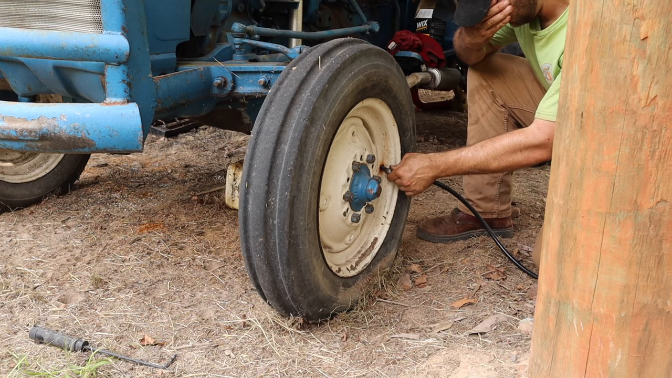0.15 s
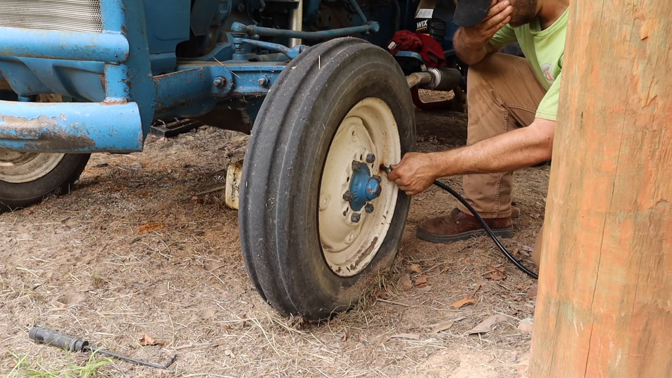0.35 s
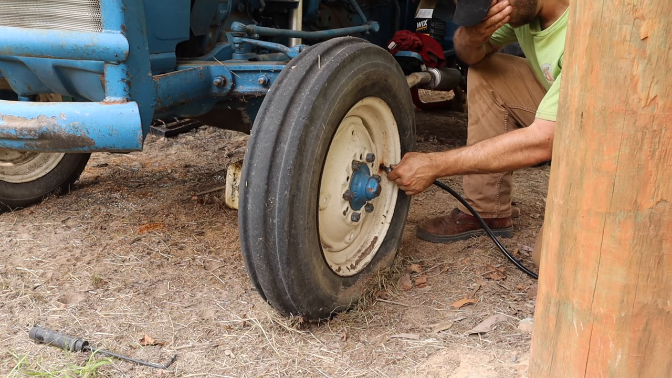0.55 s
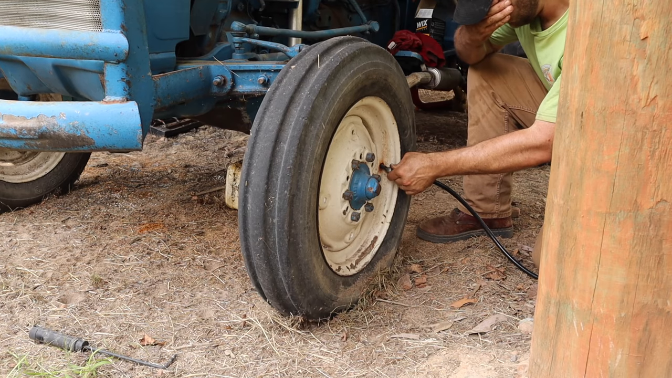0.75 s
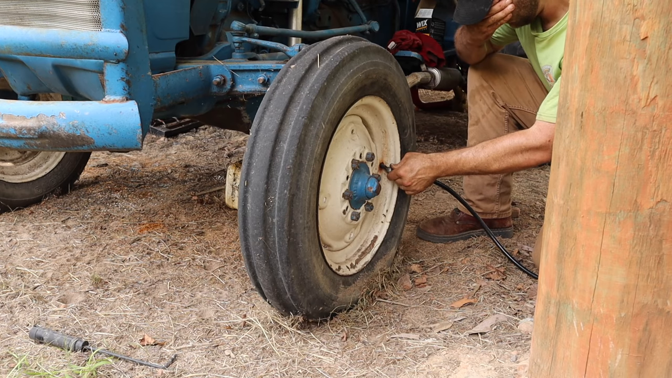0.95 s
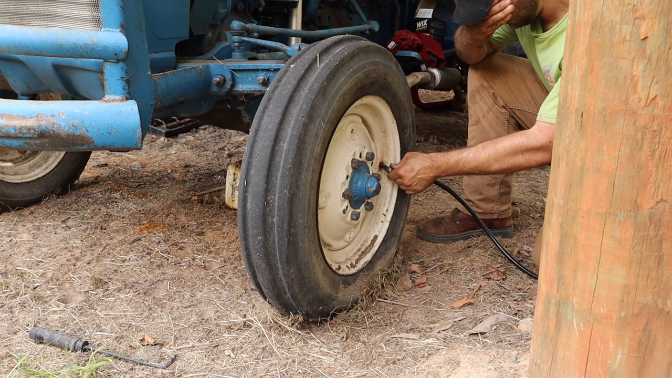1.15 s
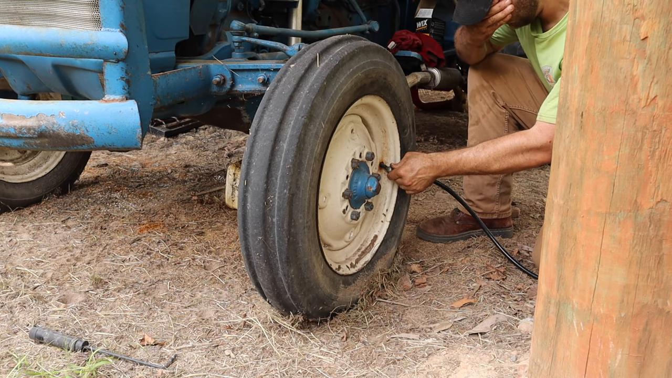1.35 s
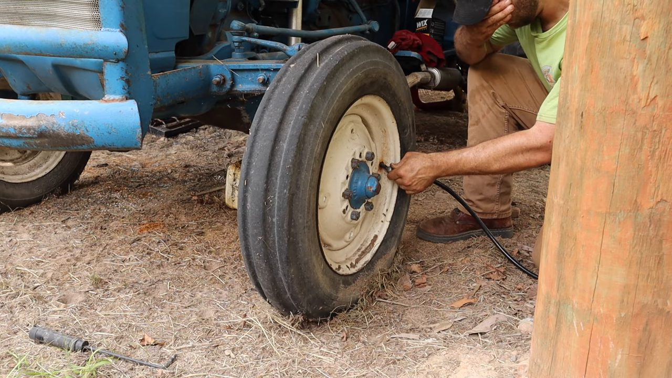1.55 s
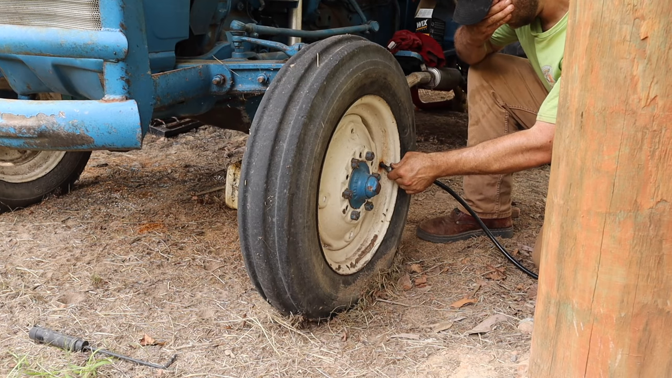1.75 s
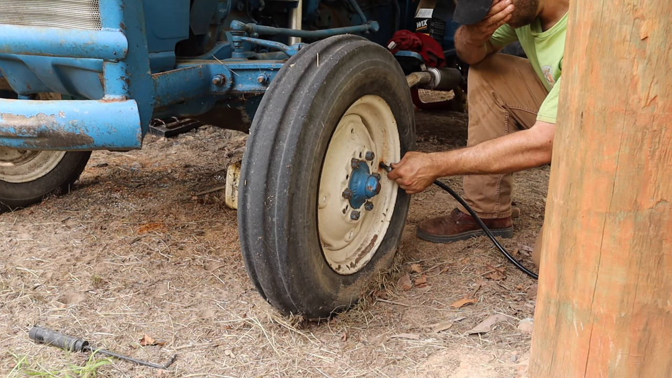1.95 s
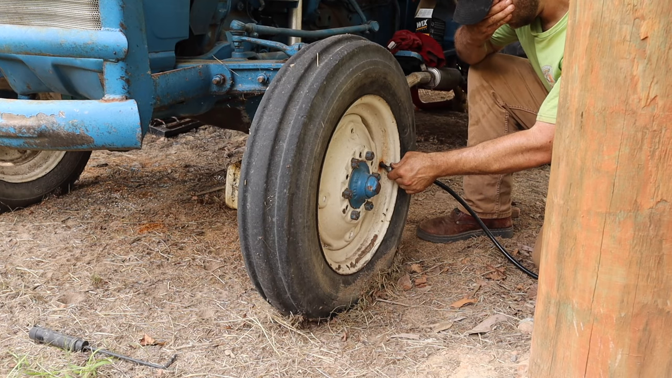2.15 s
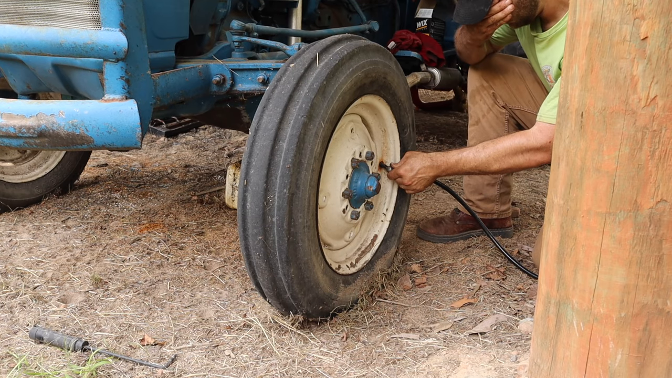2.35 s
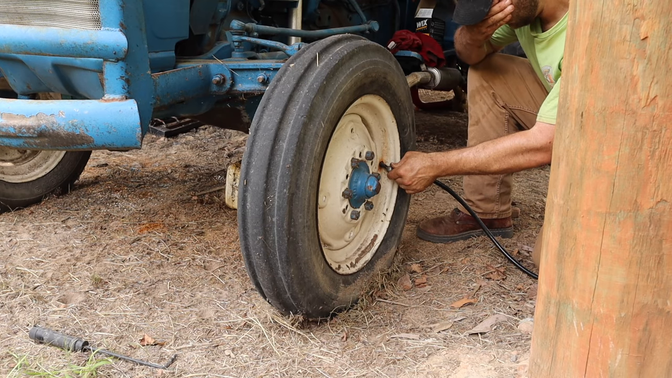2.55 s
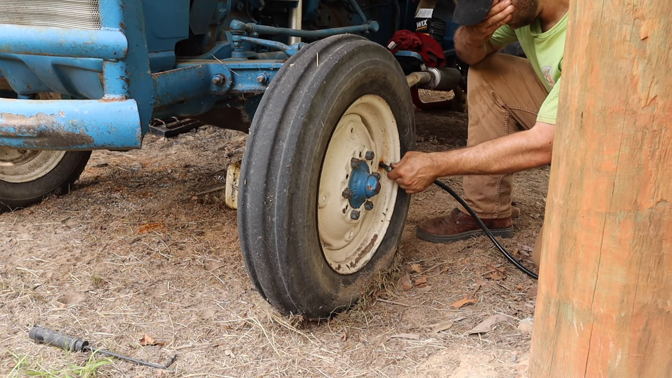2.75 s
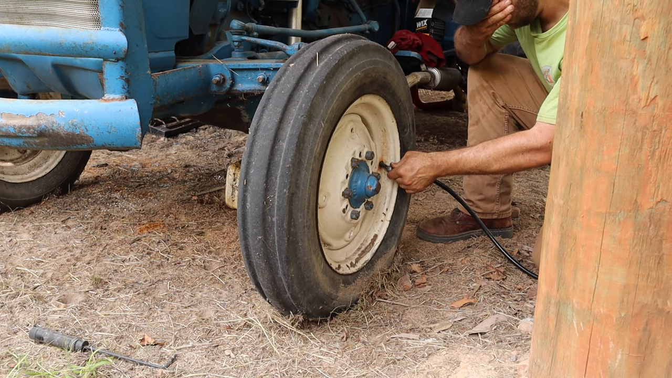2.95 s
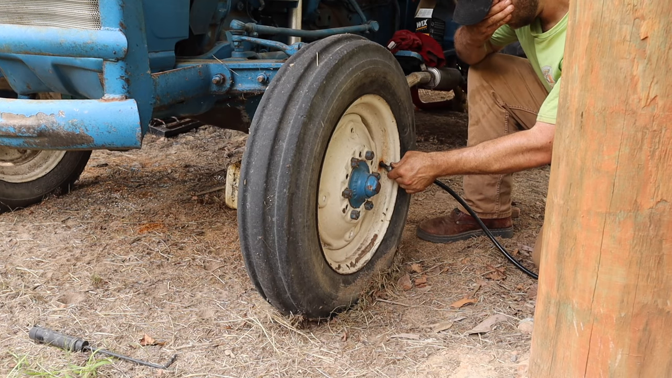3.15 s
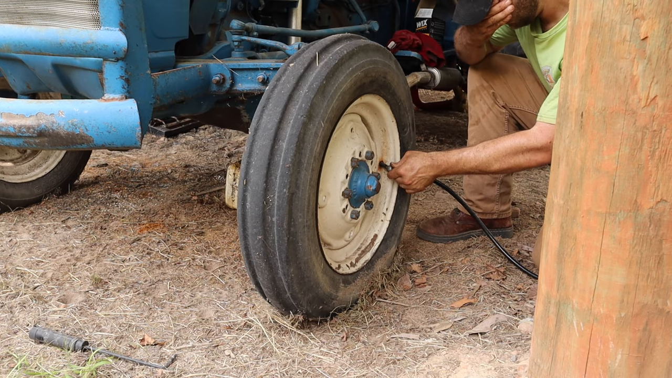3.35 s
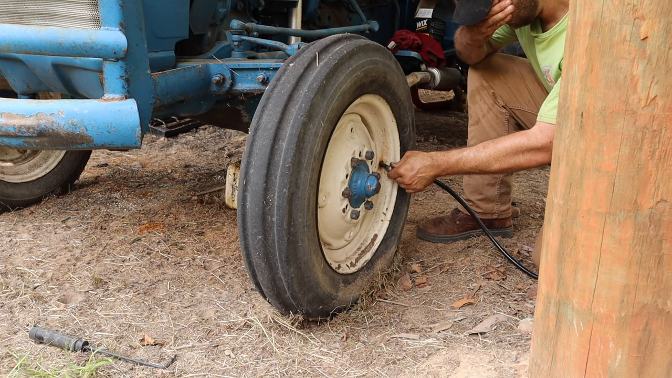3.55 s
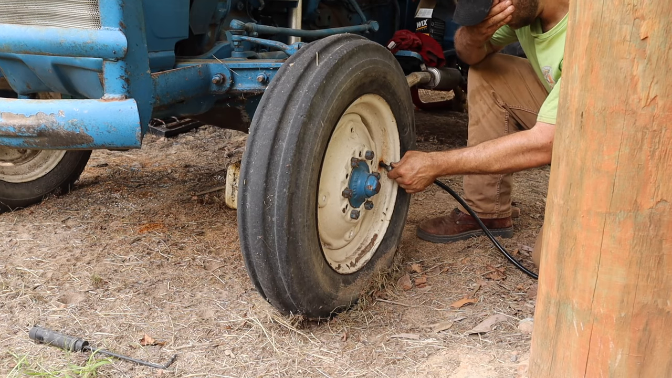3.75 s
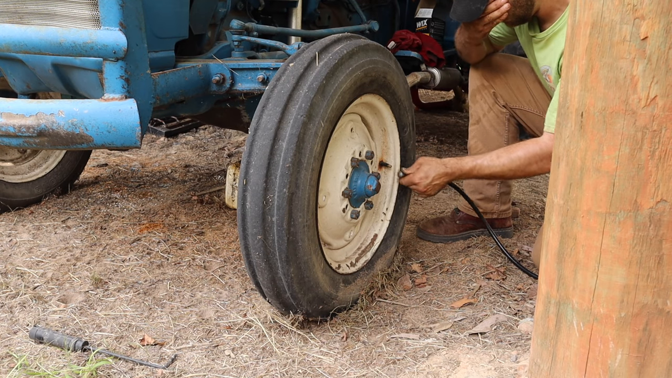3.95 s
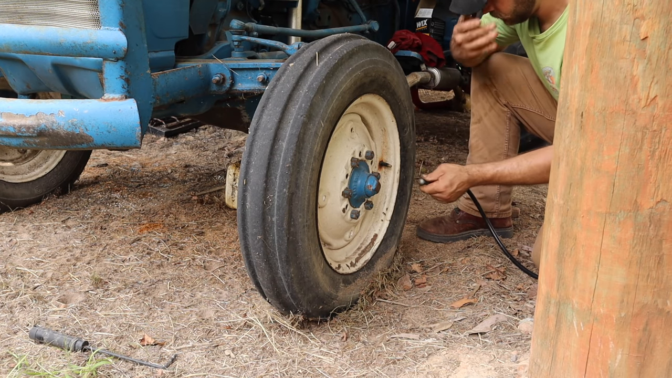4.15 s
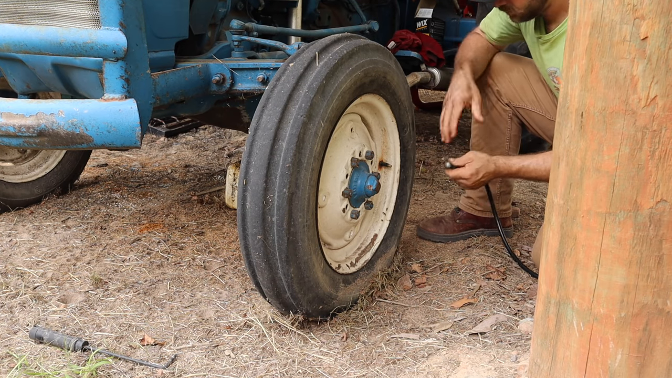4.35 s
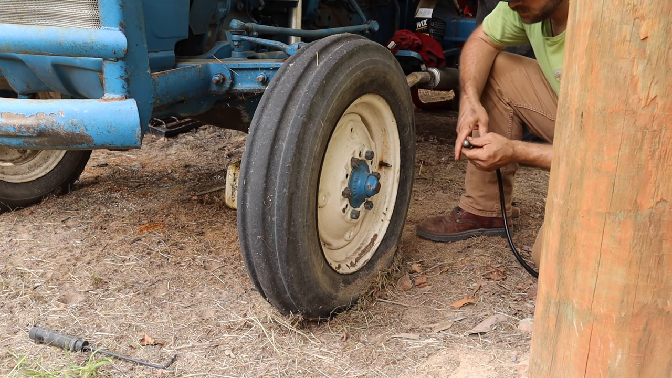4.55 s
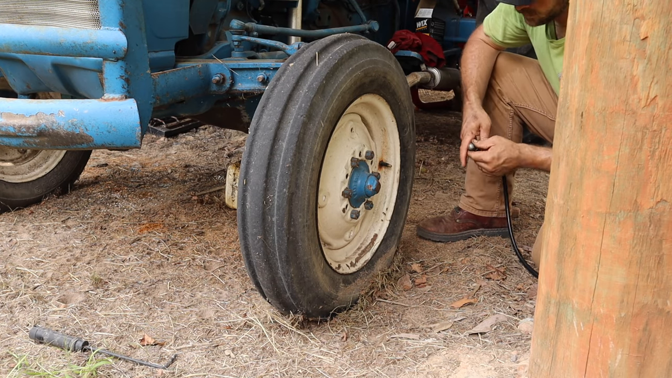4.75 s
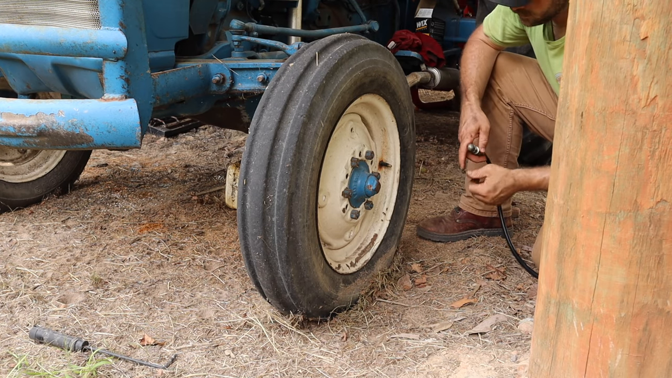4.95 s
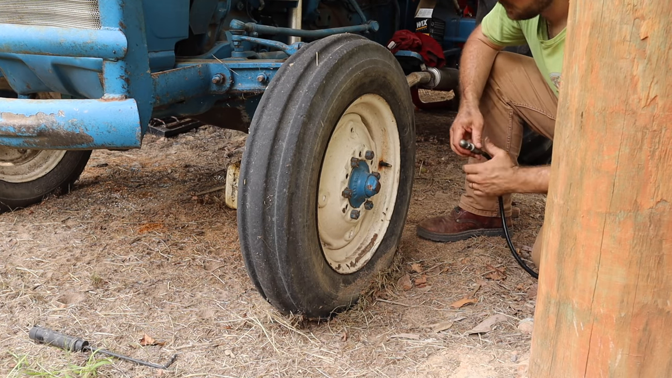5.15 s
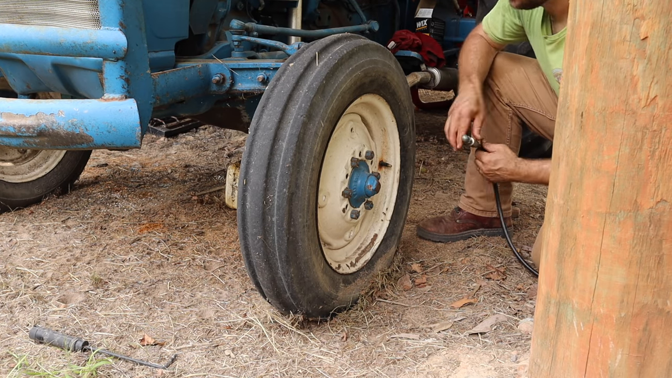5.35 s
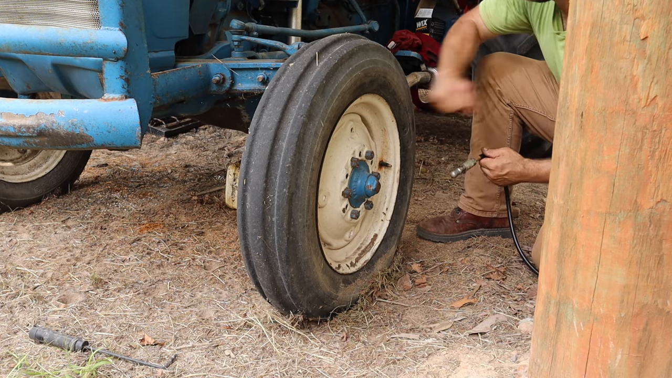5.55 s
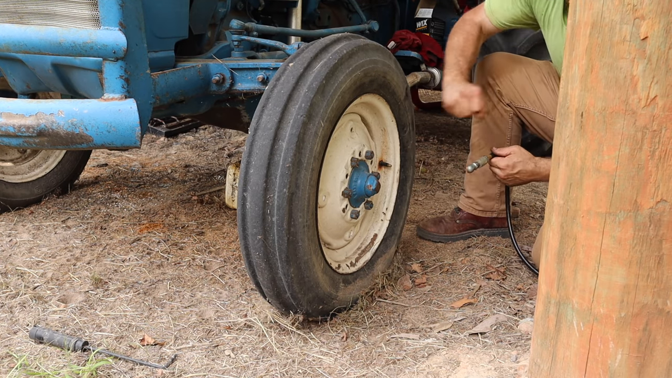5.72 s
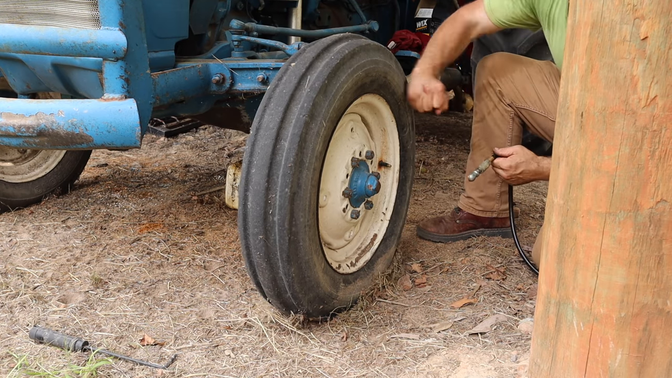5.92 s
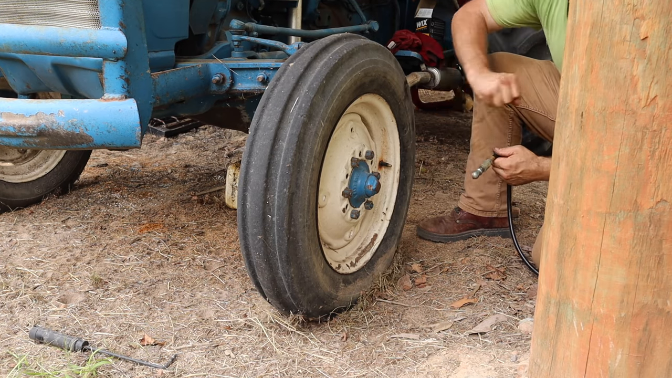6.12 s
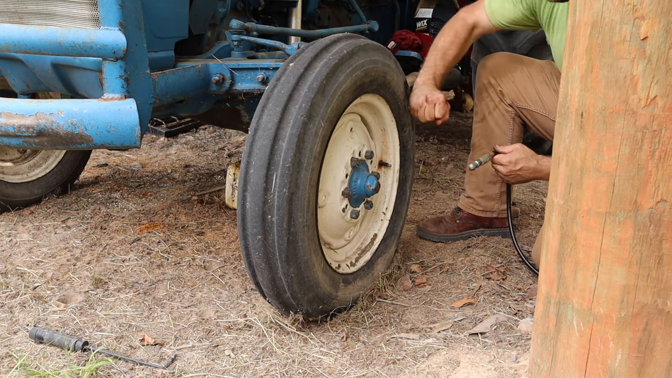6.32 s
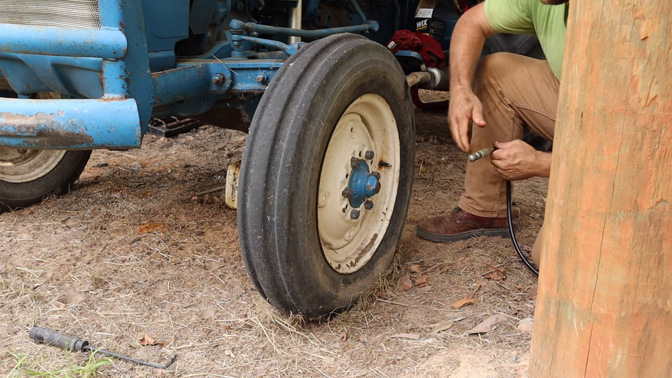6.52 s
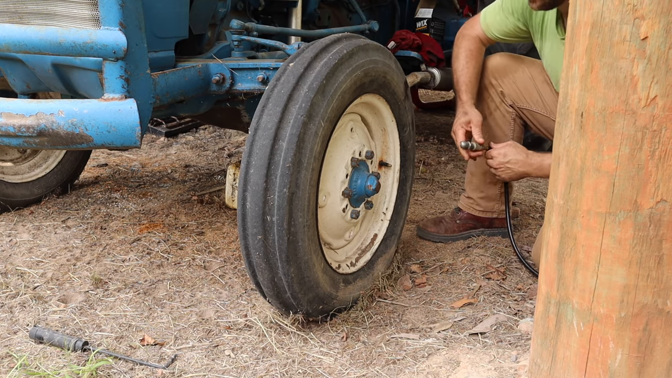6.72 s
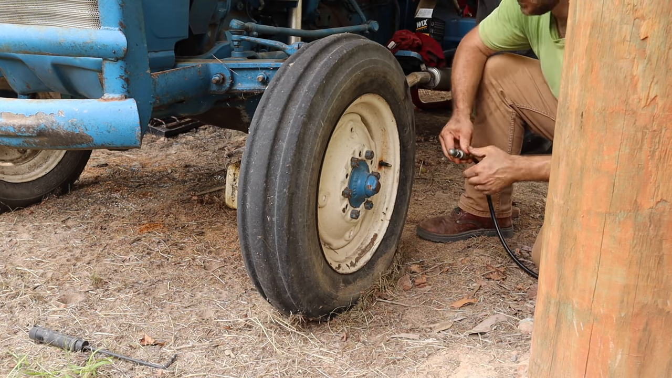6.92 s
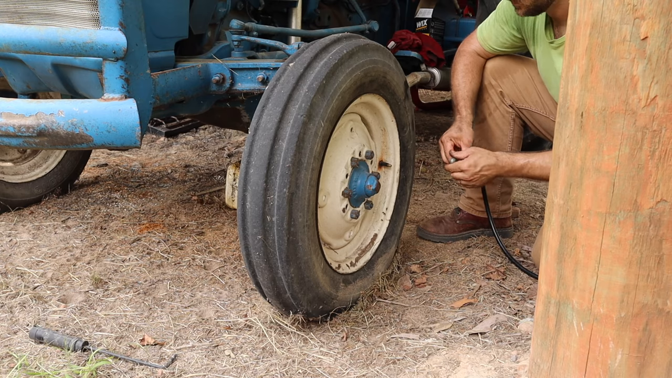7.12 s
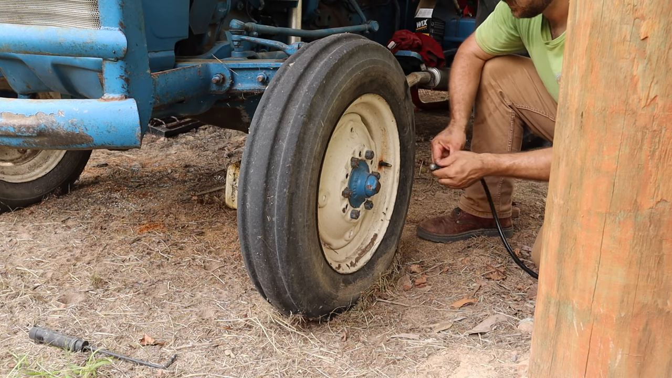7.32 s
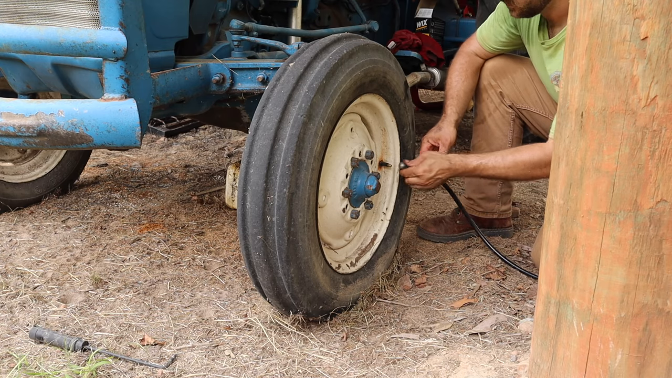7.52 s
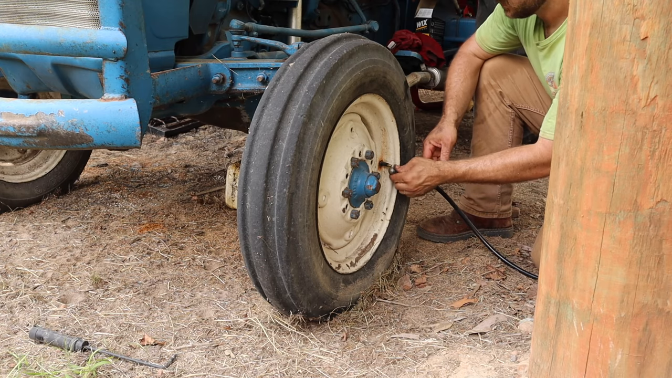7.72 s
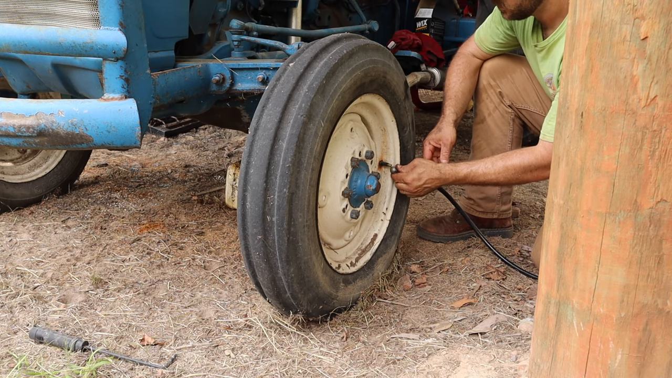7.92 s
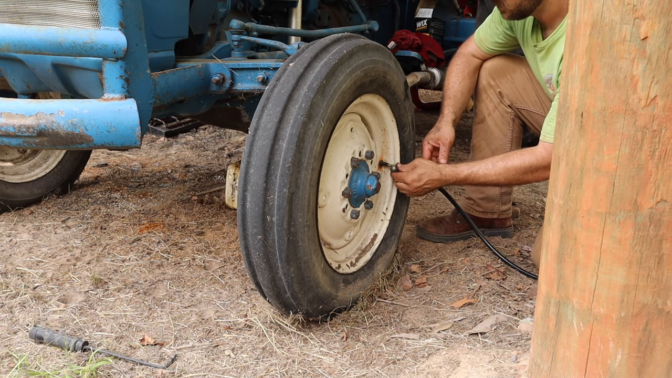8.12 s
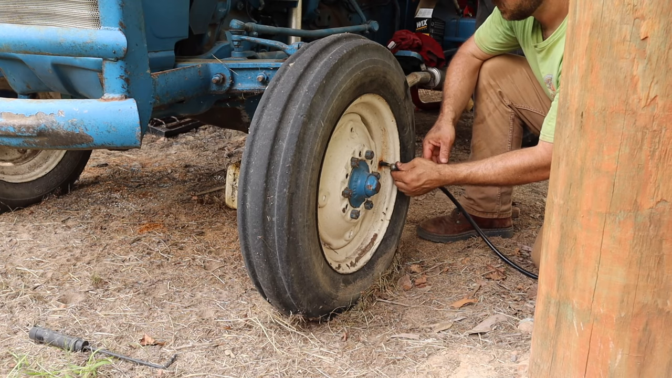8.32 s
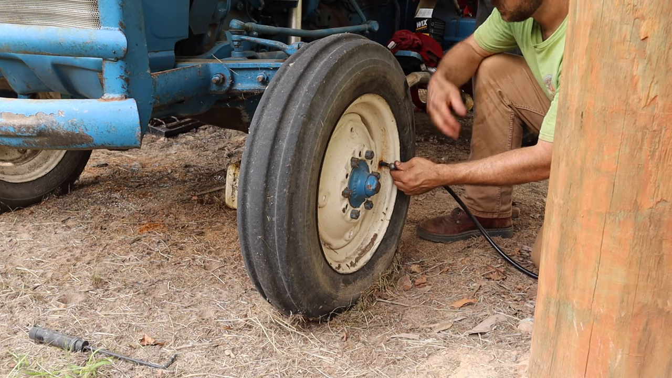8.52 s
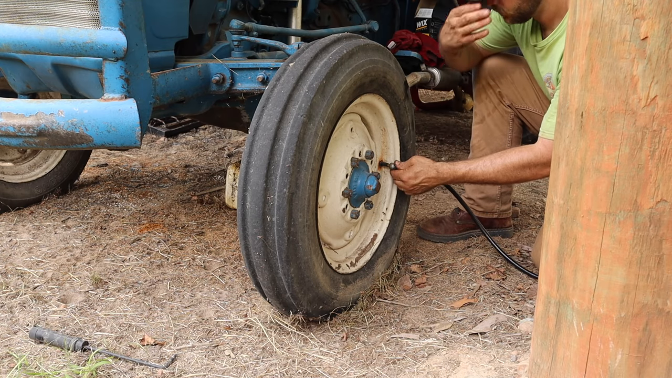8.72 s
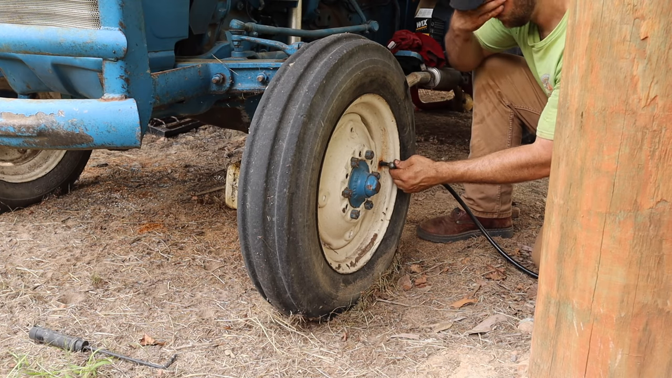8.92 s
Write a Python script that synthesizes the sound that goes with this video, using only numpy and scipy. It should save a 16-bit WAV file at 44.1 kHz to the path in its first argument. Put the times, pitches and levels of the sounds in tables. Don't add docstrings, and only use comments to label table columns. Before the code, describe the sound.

After a brief indoor hum, air sings through a tyre valve; the chuck pops off, three hollow thuds follow, then ticks and loud hissing.

```python
import sys
import numpy as np
from scipy import signal
from scipy.fft import rfft, irfft, next_fast_len
from scipy.io import wavfile
from scipy.ndimage import uniform_filter1d, map_coordinates

SR = 44100
rng = np.random.default_rng(int(sys.argv[2]) if len(sys.argv) > 2 else 0)


def gain_from_decibels(decibels):
    exponent = np.asarray(decibels, float) / 20
    return 10 ** exponent


def file_out(sig):
    cols = np.atleast_2d(sig).T
    lim = np.clip(cols, -1, 1)
    pcm = np.round(lim * 32767).astype(np.int16)
    wavfile.write(sys.argv[1], SR, pcm)


N = 400428
CUT_S = 1.183


def track(table, n, t0):
    s, *columns = np.transpose(table)
    times = t0 + np.arange(n) / SR
    return [np.interp(times, s, column) for column in columns]


def add(out, t0, x):
    i = int(t0 * SR)
    out[:, i:i + x.shape[-1]] += x[..., :N - i]


def seconds(length_s):
    return np.arange(int(length_s * SR)) / SR


def walk(n, rate):
    levels = rng.standard_normal(int(n * rate / SR) + 4)
    places = 1 + np.arange(0, n, 32) * rate / SR
    return 1.2 * map_coordinates(levels, [places], order=3).repeat(32)[:n]


def low_pass(x, order, hz):
    return signal.sosfilt(signal.butter(order, hz, fs=SR, output="sos"), x)


def high_pass(x, order, hz):
    return signal.sosfilt(signal.butter(order, hz, "high", fs=SR, output="sos"), x)


def turbulence(n, chance, colour, lifts=(), flicker_db=13.0, rate=12.0, tilt=None):
    m = next_fast_len(n, True)
    hz = np.arange(1, m // 2 + 2) * SR / m
    f, db = np.transpose(colour)
    db = np.interp(np.log(hz), np.log(f), db, left=-120, right=-120)
    for centre_hz, width, lift_db in lifts:
        db = db + lift_db / (1 + (2 * (hz - centre_hz) / width) ** 2)
    spectrum = chance * gain_from_decibels(db)
    out, untilted = np.zeros(n), 0
    for centre in 2 ** np.arange(4, 16):
        share = np.clip(1 - abs(np.log2(hz / centre)), 0, 1)
        if centre > f[0] / 2 and centre < 2 * f[-1]:
            band = irfft(spectrum * share, m)[:n] * gain_from_decibels(flicker_db * walk(n, rate))
            untilted = untilted + band
            out += band * (gain_from_decibels(tilt[1]) if tilt and centre > tilt[0] else 1)
    return out / np.std(untilted)


def ports(n, mid, side, side_db, peaks=(), alike=0., **how):
    one, other = rfft(rng.standard_normal((2, next_fast_len(n, True))))
    alike = np.clip(alike, -1, 1)
    across = np.sqrt(1 - alike ** 2) * other - 1j * alike * one
    m = turbulence(n, one, mid, [p[:3] for p in peaks], **how)
    s = gain_from_decibels(side_db) * turbulence(n, across, side, [p[:2] + p[3:] for p in peaks], **how)
    return np.array([m + s, m - s])


def knock(peak_db, bright_db, ring_hz, sharpness, t60, click, top_hz):
    t = seconds(.08)
    burst = rng.standard_normal(len(t)) + 1.4 * rng.standard_normal((2, len(t)))
    burst = burst * gain_from_decibels(-60 * t / t60)
    burst[:, 0] += click
    body = signal.iirpeak(ring_hz, sharpness, fs=SR)
    ring = signal.lfilter(*body, signal.lfilter(*body, burst))
    ring = low_pass(ring, 4, top_hz)
    crack_band = signal.butter(5, [1100., top_hz], "band", fs=SR, output="sos")
    crack = signal.sosfilt(crack_band, burst * gain_from_decibels(-60 * t / 0.011))
    return gain_from_decibels(peak_db) * (ring / abs(ring).max() + gain_from_decibels(bright_db) * crack / abs(crack).max())


def knocks(out, events, **body):
    for t0, peak_db, bright_db in events:
        add(out, t0, knock(peak_db, bright_db, **body))


# frequency in Hz, level in dB per Hz.
CORNER_MID = [(18, -69), (30, -25), (187, -12.5), (207, -14.5), (284, -7.5), (332, -8.5), (559, -8),
              (708, -8), (765, -12), (828, -10), (1470, -20.5), (1630, -17.5), (15400, -31.5)]
CORNER_SIDE = [(59, -70), (100, -40), (180, -30), (563, -6), (1150, -3), (1690, -1.5), (7070, -6),
               (8200, -6.5), (15400, -5.5)]
# frequency in Hz, width in Hz, lift in sum in dB, lift in difference in dB.
HUM = [(221, 37, 11.5, 0), (285.3, 8.2, 14, 0), (460, 16, 10, 3), (571, 14, 14, 0), (766, 7.6, 23.5, 3),
       (938, 15, 10.5, 4), (6730, 53, 10.5, 1), (8830, 90, 10.5, 2), (15800, 12000, 13.5, 3)]


def corner(out):
    tone = ports(int(CUT_S * SR), CORNER_MID, CORNER_SIDE, -5.5, HUM, flicker_db=0.5, rate=5.2)
    add(out, 0, gain_from_decibels(-44.5) * tone)


# start in seconds, peak in dB, brightness in dB.
CLATTER = [
    (.114, -28.5, -12.),
    (.119, -31.5, -13),
    (.1225, -36, -22),
    (.138, -34, -14.),
]


def clatter(out):
    knocks(out, CLATTER, ring_hz=1900, sharpness=0.63, t60=0.096, click=1.5, top_hz=7000)


# frequency in Hz, level in dB per Hz.
YARD_MID = [(12, -35), (20, -20.5), (59, 1), (178, -1), (337, -15), (377, -14), (421, -17.5), (525, -14),
            (1350, -27), (1460, -32.5), (3970, -41), (5600, -45), (6900, -53), (9600, -64), (11000, -54),
            (12400, -59), (15000, -80)]
YARD_SIDE = [ (35, -51.5), (60, -23), (132, 0), (394, 6), (2350, -10.5), (4610, -16.5), (7340, -23),
             (8240, -16), (9260, -25.5), (12000, -26), (15400, -37.5)]
# time in seconds, treble lift in dB.
BREEZE = [
    (1.2, 7.5),
    (3.9, 9),
    (4.3, 12),
    (4.55, 9),
    (5.6, 10.5),
    (6.6, 6),
    (7.3, 10),
    (9.08, 10),
]


def yard(out):
    n = N - int(CUT_S * SR)
    rustle_db = track(BREEZE, n, CUT_S)[0]
    air = ports(n, YARD_MID, YARD_SIDE, -10., alike=-.3, flicker_db=1.1, rate=6., tilt=(1500, rustle_db))
    add(out, CUT_S, gain_from_decibels(-46) * air)


# frequency in Hz, level in dB per Hz.
FILL_MID = [(530, -28.5), (900, -5.5), (1260, -13.5), (1650, -9.5), (1900, -8.5), (4380, -4), (4990, -9),
            (5420, -5), (6330, -8.5), (7470, -6), (12500, -3.5), (14000, -13), (15400, -13.5)]
FILL_SIDE = [(530, -34.5), (900, -11.5), (3210, -16), (4480, -0.5), (4810, -8.5), (5480, -4.5),
             (6710, -21.5), (7470, -6), (8120, -5), (8410, -5), (8930, -11), (12600, -7), (15400, -19)]
# frequency in Hz, width in Hz, lift in sum in dB, lift in difference in dB.
VALVE = [(1665, 24, 14.5, -1), (2220, 63, 6.5, 5), (3340, 80, 3.5, 6), (4430, 90, 1.5, 5.5),
         (4570, 79, 6.5, 5), (4994, 200, -1, 5.5), (6030, 200, -2, 5.5), (5635, 130, 2, 5),
         (7680, 220, 6.5, 10.5), (8540, 110, 4.5, 8), (9360, 150, 1.8, 0.5), (11000, 194.2, 2, 6.5),
         (12480, 340, 6.5, -1.5)]


def filling(out):
    level_db, pan_db = -44, 1
    n = int((SPITS[0][0] + 0.0056 - CUT_S) * SR)
    hiss = ports(n, FILL_MID, FILL_SIDE, 3.6, VALVE, alike=-.4, flicker_db=0.5, rate=13.0)
    add(out, CUT_S, gain_from_decibels(level_db + pan_db * np.array([[.5], [-.5]])) * hiss)


# start in seconds, end in seconds, first, middle and last pitch in Hz.
FIRST_BIRD = [(1.74, 1.83, 4300, 4780, 3600), (1.96, 2.04, 3950, 3600, 3300),
              (2.21, 2.46, 3520, 3760, 4000), (2.46, 2.62, 4020, 4220, 4350)]
SECOND_BIRD = [(5.07, 5.13, 3800, 3100, 2600), (5.34, 5.39, 3400, 3100, 2900), (5.46, 5.51, 3400, 3100, 2900),
               (8.0, 8.045, 4000, 3980, 3900), (8.075, 8.13, 4000, 3900, 4100), (8.16, 8.2, 4900, 4400, 3900)]
LAST_BIRD = [(5.57, 5.63, 3800, 4300, 4750), (7.94, 8.005, 3700, 3980, 3750),
             (8.04, 8.085, 3800, 4400, 4750), (8.21, 8.4, 3560, 3420, 3650)]


def birds(out):
    for whistles, db in [(FIRST_BIRD, -54), (SECOND_BIRD, -56.5), (LAST_BIRD, -56.5)]:
        for t0, t1, *pitches_hz in whistles:
            n = int((t1 - t0) * SR)
            curve = np.polyfit([0, .5, 1], pitches_hz, deg=2)
            hz = np.polyval(curve, np.arange(n) / n) + 20 * walk(n, 40.)
            phase = 2 * np.pi * np.cumsum(hz) / SR + np.array([[0], [2.2]])
            level = gain_from_decibels(db + 1.5 * walk(n, 40.0)) * signal.windows.tukey(n, .3)
            add(out, t0, level * np.sin(phase))


# start in seconds, end in seconds, pitch in Hz, width in Hz, level in dB, difference over sum in dB.
HIGH_BANDS = [(3.9, 4.52, 4430, 260, -64, 14), (3.9, 4.45, 5500, 300, -66, 14), (3.9, 4.6, 4950, 700, -66, 13),
              (4.15, 5.36, 10100, 420, -71, 6), (4.4, 5.15, 4640, 300, -66, 8), (4.5, 5.6, 5200, 900, -66, 8),
              (5.03, 5.55, 4130, 90, -62, 5), (4.9, 5.64, 5850, 80, -67, 5), (5.15, 5.45, 4650, 90, -72, 8),
              (5.6, 6.2, 4300, 600, -68, 8), (3.95, 4.35, 7700, 200, -70, 8), (3.6, 9., 8200, 900, -72, 8),
              (7.1, 7.7, 11000, 1500, -74, 6), (4., 4.45, 11200, 500, -73, 8)]


def high_bands(out):
    for t0, t1, hz, width, db, side_db in HIGH_BANDS:
        n = int((t1 - t0) * SR)
        band = [(hz - 1.5 * width, -24), (hz - width / 3, 0), (hz + width / 3, 0), (hz + 1.5 * width, -24)]
        thin_hiss = ports(n, band, band, side_db, flicker_db=1.0, rate=7.5)
        add(out, t0, gain_from_decibels(db) * signal.windows.tukey(n, .3) * thin_hiss)


# start in seconds, rise in seconds, fall in seconds,
# level in dB, sag in dB.
SPITS = [
    (3.852, 0.0056, 0.00085, -9.5, -0.4),
    (8.961, .011, 0.003, -8, -8.5),
]
SPIT_HOLD_S = [0.018, .025]
# frequency in Hz, level in dB per Hz.
SPIT_MID = [
    [(35, -41), (80, -14), (170, 0), (400, -12.5), (612, -16.5), (1150, -4.5), (2250, -5.5), (3110, -1),
     (4950, -5.5), (5430, -3), (12000, -2.5), (15400, -17)],
    [(35, -38), (60, -12.5), (626, -8.5), (1150, -15), (2090, -5), (2300, -11.5), (3110, -5.5),
     (5960, -7.5), (10900, -2), (14400, -15.5), (15400, -25.5)],
]
SPIT_SIDE = [
    [(120, -42.5), (200, -16), (574, -10), (1030, 0.5), (4170, -10.5), (8780, -5), (10300, -8), (11300, 3),
     (15400, -22.5)],
    [(120, -37), (200, -6), (544, -11), (2090, -7.5), (3670, -10.5), (8320, -6.5), (8940, -14), (11300, 2),
     (15400, -19.5)],
]


def spits(out):
    t = seconds(.06)
    for (t0, rise, fall, db, sag_db), hold, mid, side in zip(SPITS, SPIT_HOLD_S, SPIT_MID, SPIT_SIDE):
        opening = np.clip(t / rise, 0, 1) ** 3
        closing = np.exp(-np.clip(t - rise - hold, 0, 1) / fall)
        level = gain_from_decibels(db + sag_db * np.clip((t - rise) / hold, 0, 1))
        jet = ports(len(t), mid, side, -2.6, alike=.45, flicker_db=1.5, rate=220.0)
        add(out, t0, level * opening * closing * jet)


# frequency in Hz, level in dB per Hz.
WEEP = [(2500, -23.5), (4300, -4.5), (5800, -6), (7000, -10.5), (12500, -9.5), (13500, -33.5)]


def weeping(out):
    length_s, t60_s = 0.7, 1.6
    t = seconds(length_s)
    seating = gain_from_decibels(-50 - 60 * t / t60_s) * np.clip((length_s - t) / 0.2, 0, 1)
    add(out, SPITS[0][0], seating * ports(len(t), WEEP, WEEP, 9., VALVE, flicker_db=2.0, rate=12.0))


# frequency in Hz, level in dB per Hz.
HOLLOW = [(150, -33), (260, -6.5), (420, 0.5), (700, -1), (1500, -9), (2500, -10), (4200, -20), (6000, -37)]
HOLLOW_BY_SPIT_DB = [5.5, -16]


def wheel_dish(out):
    t = seconds(.3)
    for (t0, rise, _, db, _), hold, boom_db in zip(SPITS, SPIT_HOLD_S, HOLLOW_BY_SPIT_DB):
        boom = ports(len(t), HOLLOW, HOLLOW, -12.0, flicker_db=1.5, rate=40.)
        add(out, t0 + rise + hold, gain_from_decibels(db + boom_db - 28.5 - 60 * t / 0.35) * boom)


# start in seconds, peak in dB, brightness in dB.
SHUT = [(3.8768, -2, -17.5)]


def ball_shuts(near, far):
    wet = .4
    for t0, peak_db, bright_db in SHUT:
        sound = knock(peak_db, bright_db, ring_hz=1200, sharpness=0.77, t60=0.0076, click=10, top_hz=9000)
        add(near, t0, wet * sound)
        add(far, t0, (1 - wet) * sound)


# start in seconds, level in dB.
STALKS = [(4.66, -66), (4.73, -65), (4.8, -63), (5.14, -59), (5.21, -52.5), (7.55, -52), (7.6, -64),
          (7.74, -55)]


def stalks(out):
    t = seconds(.04)
    band = [(8500, -30), (10000, 2), (12500, -2.0), (14000, -30)]
    for t0, db in STALKS:
        add(out, t0, gain_from_decibels(db - 9.5 - 60 * t / 0.053) * ports(len(t), band, band, 8.))


# start in seconds, peak in dB, brightness in dB.
SNAP = [
    (5.6466, -19.5, -8.5),
    (5.9686, -28.5, -10),
]


def skin_snaps(out):
    knocks(out, SNAP, ring_hz=8500, sharpness=1.1, t60=0.00605, click=3.38, top_hz=14000)


# start in seconds, click in dB, rebound in dB.
KNUCKLES = [(5.6469, -12, -18), (5.6478, -26, -14), (5.9688, -9, -12), (5.9699, -20, -14), (6.2889, -4, -9),
            (6.2899, -11, -9), (6.2914, -5, -15)]
SKIN_HZ = [17000, 16980, 12000, 12000, 12500, 11950, 11000]


def knuckles(out):
    t = seconds(.02) - .0005
    for (t0, click_db, rebound_db), top_hz in zip(KNUCKLES, SKIN_HZ):
        suction = -np.exp(-(t / .000048) ** 2)
        scuff = uniform_filter1d(rng.standard_normal((2, len(t))), size=2) * gain_from_decibels(-60 * abs(t) / 0.003)
        click = low_pass(suction + 0.78 * scuff, 4, top_hz)
        rebound = (t > 0) * np.sin(2 * np.pi * 700 * t) * gain_from_decibels(-60 * t / .007)
        add(out, t0 + t[0], gain_from_decibels(click_db) * click + gain_from_decibels(rebound_db) * rebound)


# frequency in Hz, level in dB, t60 in seconds.
TYRE = [
    [(40, -21.5, 1.5), (153.7, -2, 0.24), (161.5, -1, 0.33), (207, -11.5, 0.31), (237, -16.5, 0.63),
     (298.5, -24, 0.72), (355, -12, 0.37), (420, -10, 0.26), (439, -22, 0.62), (551, -17.5, 0.42),
     (645, -22.5, 0.43), (685, -0.5, 0.062), (1360, -33, 0.63)],
    [(40, -23.5, 1.26), (146.5, 0, 0.3), (205, -17.5, 0.2), (249.7, -15, 0.38), (309, -25.5, 0.56),
     (360, -28, 0.2), (408, -10, 0.18), (428, -9.5, 0.34), (512, -15, 0.31), (570, -21, 0.15),
     (656, -2.5, 0.1), (777, -26, 0.18)],
    [(40.3, -28.5, 1.24), (150.3, -1.5, 0.35), (202.2, -14.5, 0.13), (251, -18, 0.51), (299, -26, 0.4),
     (398.4, -11, 0.37), (462, -16.5, 0.33), (551, -25, 0.256), (630, -19, 0.26), (765, -19.5, 0.26),
     (837, -19, 0.35)],
]
# frequency in Hz, level in dB, t60 in seconds.
AXLE = [(79.2, -15, 0.19), (113, -5, 0.13)]
# frequency in Hz, level in dB, t60 in seconds.
DISC = [(426, -40, 2.4), (501, -48, 1.5), (711, -50, 1.2)]


def tyre_ring(modes, t):
    squash, squash_s = .2, 0.021
    modes = modes + AXLE
    hz, db, t60 = np.transpose(modes)[:, :, None]
    dented = (hz > 90) * (hz < 301)
    lag = dented * squash * squash_s * (1 - np.exp(-t / squash_s))
    phase = 2 * np.pi * (hz * (t - lag) + rng.random((len(modes), 1)))
    waver = np.array([[walk(len(t), 24.0), walk(len(t), 25.2)] for _ in modes])
    waver = waver * np.clip(hz / 570.0, 0, 1)[:, None]
    level = gain_from_decibels(db - 60 * t / t60 + 1.77 * waver[:, 0])
    ring = np.sum(level * np.sin(phase + 0.99 * waver[:, 1]), axis=0)
    for disc_hz, disc_db, disc_t60 in DISC:
        ring += gain_from_decibels(disc_db - 60 * t / disc_t60) * np.sin(2 * np.pi * disc_hz * t)
    return ring


# start in seconds, body in dB, swell in seconds, dust and rattle in dB.
BLOWS = [
    (5.648, -4, 0.027, -40),
    (5.9697, -1.5, 0.029, -38.5),
    (6.293, -1, 0.021, -32.5),
]
# frequency in Hz, level in dB per Hz.
THUD = [(40, -23), (60, -19.5), (120, 2.5), (200, -2), (277, -5), (409, -6.5), (491, -7.5), (815, -12),
        (1030, -19.5), (2500, -39), (3250, -55)]
THUD_SIDE = [(150, -45), (299, -30), (404, 3.5), (989, -3), (1240, -10.5), (1660, -22), (2500, -16.5),
             (3250, -44)]


def blows(out):
    t = seconds(1.2)
    for (t0, body_db, swell, _), modes in zip(BLOWS, TYRE):
        ring = tyre_ring(modes, t)
        dying = gain_from_decibels(-60 * t / 0.29) + gain_from_decibels(-15.0 - 60 * t / 0.94)
        shudder = gain_from_decibels(-8.5) * dying * ports(len(t), THUD, THUD_SIDE, -19.5, flicker_db=0.5, rate=28.0)
        onset = np.clip(t / 0.0019, 0, 1)
        build = 0.16 + 0.77 * np.sin(np.pi / 2 * np.clip(t / swell, 0, 1)) ** 3.5
        add(out, t0, gain_from_decibels(body_db) * onset * build * (ring + shudder))


# frequency in Hz, level in dB per Hz.
RATTLE = [(710, -35), (1200, -1.5), (1930, -2.5), (2110, -6.5), (10100, -22), (10900, -20), (12800, -32),
          (14000, -76)]
RATTLE_SIDE = [(710, -35), (1200, -4.5), (2100, -9), (4000, -12), (7000, -18), (10900, -14.5),
               (13500, -24.5), (15400, -49.5)]
# frequency in Hz, width in Hz, lift in sum in dB, lift in difference in dB.
TIN = [(2120, 140, 1, 8), (3130, 250, 5.5, 4.5), (4130, 250, 4, 3), (4910, 250, 1, 1.5)]


def rattle(out):
    t = seconds(1.2)
    for t0, _, _, rattle_db in BLOWS:
        settle = gain_from_decibels(rattle_db - 60 * t / 1.0 - 60 * np.clip(t - 0.085, 0, 1) / 0.33)
        add(out, t0, settle * ports(len(t), RATTLE, RATTLE_SIDE, 0., TIN, flicker_db=2.5, rate=230.0))


# start in seconds, peak in dB, brightness in dB.
GRIT = [(5.653, -33.5, 8.5), (5.658, -37.5, 9.5), (5.667, -30, -14.5), (5.9745, -32.5, 4), (5.981, -32, -6),
        (5.9923, -26, 0), (6.0257, -38, -8), (6.302, -31.5, 4), (6.338, -33, -6), (6.3826, -36, -9)]


def grit(out):
    knocks(out, GRIT, ring_hz=2900, sharpness=1.1, t60=0.034, click=2.15, top_hz=11000)


# start in seconds, level in dB, t60 in seconds.
JINGLES = [
    (5.667, -44, .08),
    (6.059, -38.5, .16),
    (6.382, -41.5, .1),
]
# frequency in Hz, level in dB.
JINGLE = [(2130, 2), (3150, -7), (4250, -8)]


def jingles(out):
    t = seconds(.2)
    for t0, db, t60 in JINGLES:
        ring = 0
        for hz, mode_db in JINGLE:
            level = gain_from_decibels(mode_db + 3.5 * walk(len(t), 200.))
            phase = 2 * np.pi * hz * t + 1.6 * walk(len(t), 178.0) + np.array([[0], [.8]])
            ring = ring + level * np.sin(phase)
        add(out, t0, gain_from_decibels(db - 60 * t / t60) * np.clip(t / .003, 0, 1) * ring)


# start in seconds, peak in dB, brightness in dB.
TAPS = [(7.7437, -36, -14), (7.881, -33.5, 5), (8.269, -26.5, -10), (8.402, -42, -8), (8.4108, -30, -5),
        (8.419, -33, -3), (8.4375, -30, -2)]


def taps(out):
    knocks(out, TAPS, ring_hz=2700, sharpness=1.24, t60=0.014, click=5.3, top_hz=8200)


# start in seconds, peak in dB, brightness in dB.
DRAGS = [(7.756, -38, -14), (7.763, -41, -21), (7.772, -42.5, -17.5), (7.78, -47, -16.5),
         (7.791, -41.5, -19), (7.7965, -36.5, -19), (7.896, -46.5, -16), (8.0635, -43, -12),
         (8.279, -43.5, -14), (8.286, -48.5, -15)]


def drags(out):
    knocks(out, DRAGS, ring_hz=2500, sharpness=2, t60=0.044, click=2.7, top_hz=8800)


# time in seconds, level in dB.
LEAK = [(8.434, -52.5), (8.437, -43), (8.445, -37.5), (8.448, -32), (8.46, -30.5), (8.463, -25),
        (8.497, -19), (8.72, -21), (8.97, -24)]
# frequency in Hz, level in dB per Hz.
LEAK_MID = [(240, -54), (400, -23.5), (1560, -8), (2120, -7.5), (2580, -2.5), (4680, -3), (6070, -7),
            (6860, -5), (8370, -0.5), (9320, -5), (11900, -4), (13400, -9.5), (15400, -18.5)]
LEAK_SIDE = [(240, -59), (400, -30), (2220, -24), (2620, -18.5), (3350, -21.5), (3900, -11), (6260, -12.5),
             (7190, -13), (10100, -11.5), (11700, -2.5), (15400, -21.5)]
# frequency in Hz, width in Hz, lift in sum in dB, lift in difference in dB.
CHUCK = [(3050, 110, 0.85, 6), (7045, 300, 9.1, 11), (8460, 270, 7.2, 8), (9900, 400, 3, 5.5),
         (11630, 440, 4, -5)]


def leak(out):
    t0 = LEAK[0][0]
    n = int((LEAK[-1][0] - t0) * SR)
    t = np.arange(n) / SR
    slit_db = -13 * np.exp(-(t / .03) ** 2)
    slack_db = 28.5 * np.clip(t0 + t - 8.76, 0, 1)
    low_db = -12.5 + slit_db + slack_db
    treble = (5000, -low_db - 7.)
    jet = ports(n, LEAK_MID, LEAK_SIDE, -4., CHUCK, alike=.65, flicker_db=1., rate=40., tilt=treble)
    add(out, t0, gain_from_decibels(track(LEAK, n, t0)[0] + low_db + 8.5) * jet)


def refilling(out):
    add(out, 8.99, gain_from_decibels(-41) * ports(SR // 10, FILL_MID, FILL_SIDE, 0., flicker_db=.8, rate=11.0))


def shed(x, t60_low=0.46, t60_high=0.47, split_hz=3200.0, gap=0.0072, wet_db=-25.5, alike_hz=702.0):
    t = seconds(.6)
    m, s = rng.standard_normal((2, len(t)))
    s = 1.7 * high_pass(s, 2, alike_hz)
    noise = np.array([m + s, m - s])
    low = low_pass(noise, 2, split_hz)
    high = 0.23 * (noise - low)
    echoes = (low * gain_from_decibels(-60 * t / t60_low) + high * gain_from_decibels(-60 * t / t60_high)) * (t > gap)
    echoes = echoes * gain_from_decibels(3.5 * np.exp(-((t - 0.07) / 0.025) ** 2))
    echoes = high_pass(echoes, 1, 220.)
    echoes = echoes / np.sqrt(np.sum(echoes[0] ** 2))
    return gain_from_decibels(wet_db) * signal.fftconvolve(x, echoes, axes=1)[:, :N]


def scene():
    near, far = np.zeros((2, N)), np.zeros((2, N))
    for source in (corner, yard, filling, birds, high_bands, weeping, stalks, refilling):
        source(far)
    for source in (clatter, spits, wheel_dish, skin_snaps, knuckles, blows):
        source(near)
    for source in (rattle, grit, jingles, taps, drags, leak):
        source(near)
    ball_shuts(near, far)
    return far + near + shed(near)


def roll_off(x):
    return signal.sosfilt(signal.butter(12, 15580, fs=SR, output="sos"), x)


def record(dry):
    mix = np.clip(1.72 * np.tanh(dry / 1.542), -1, 1)
    return roll_off(mix)


dry = scene()
out = record(dry)
file_out(out)
```